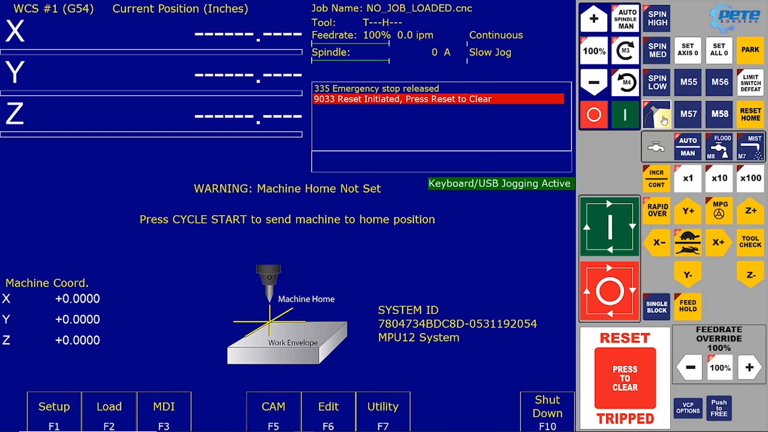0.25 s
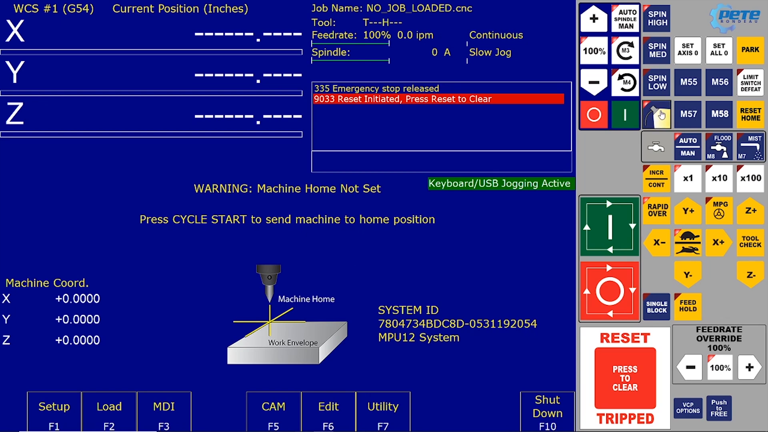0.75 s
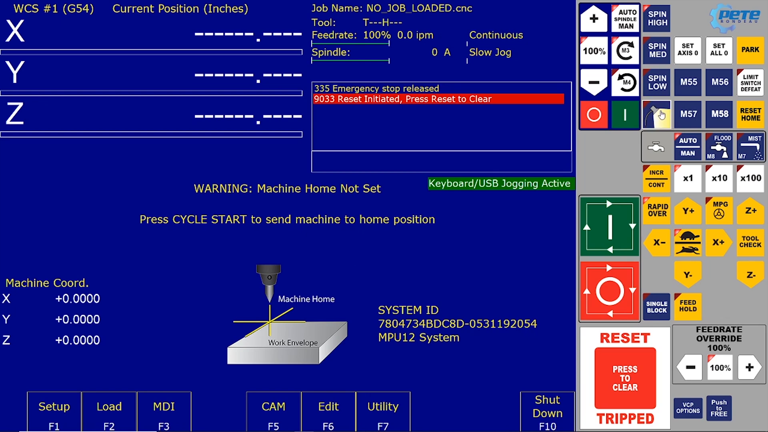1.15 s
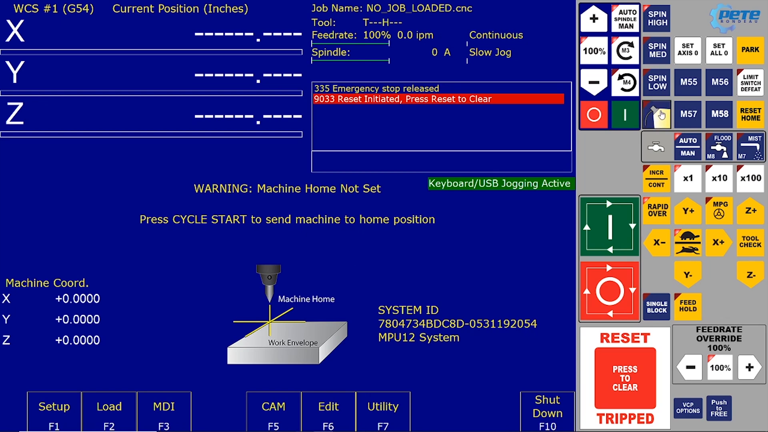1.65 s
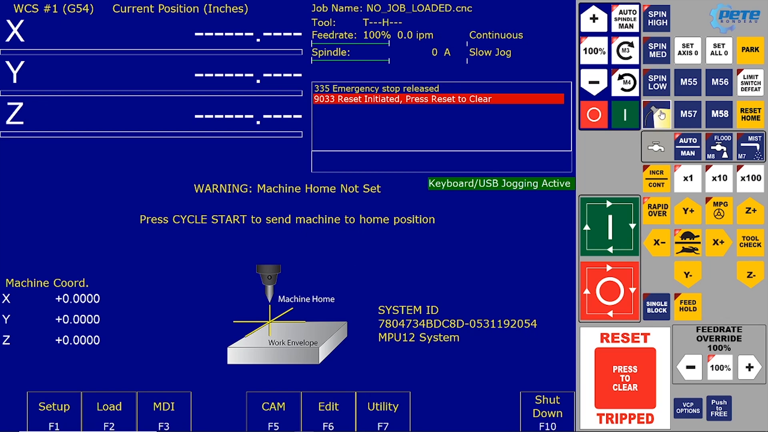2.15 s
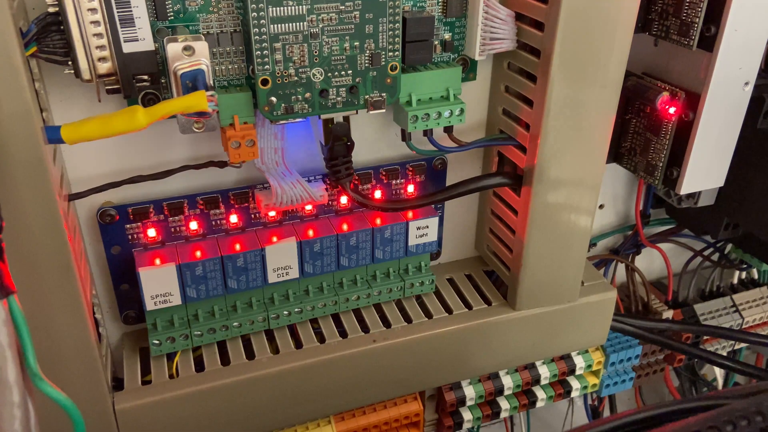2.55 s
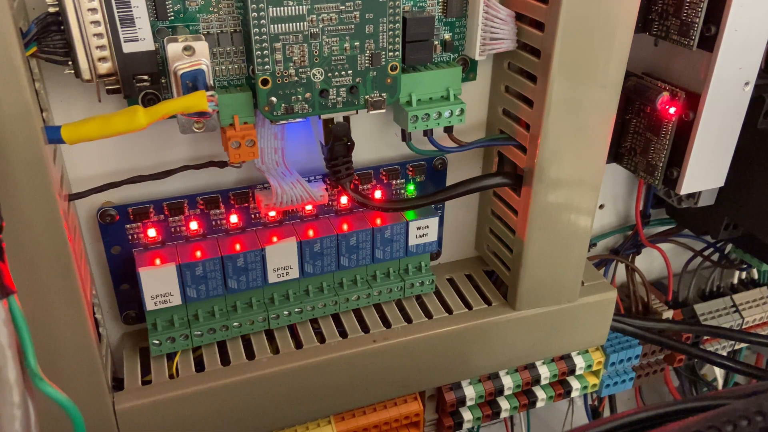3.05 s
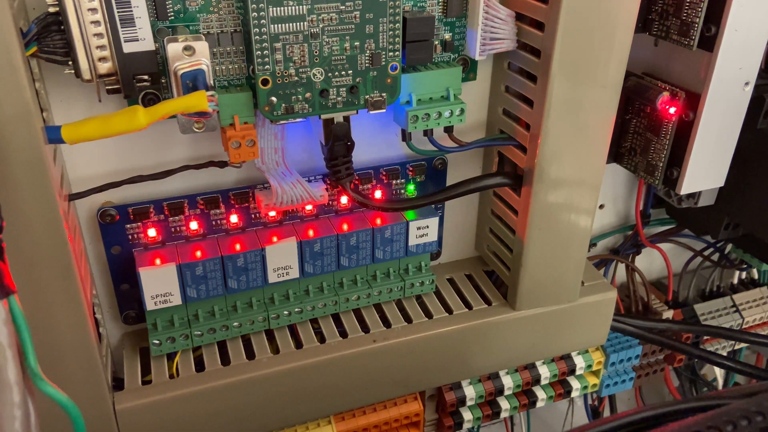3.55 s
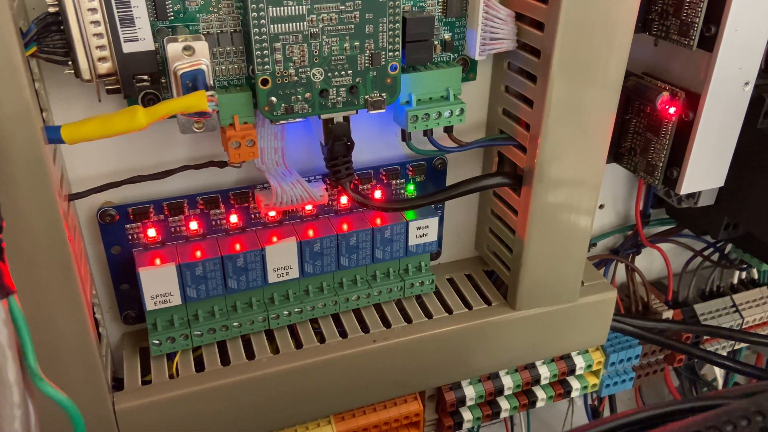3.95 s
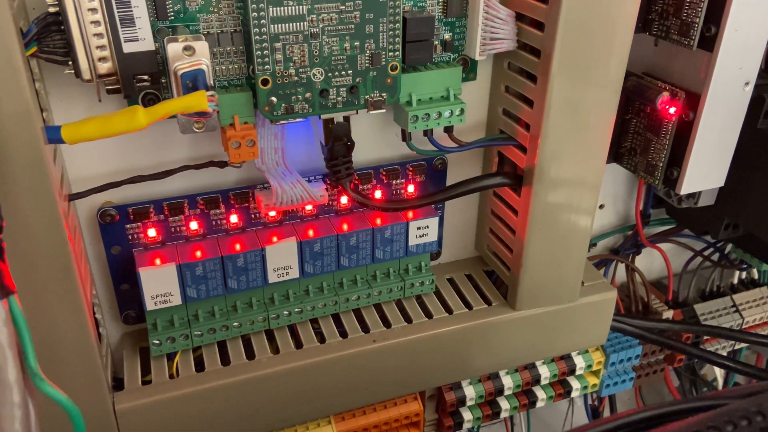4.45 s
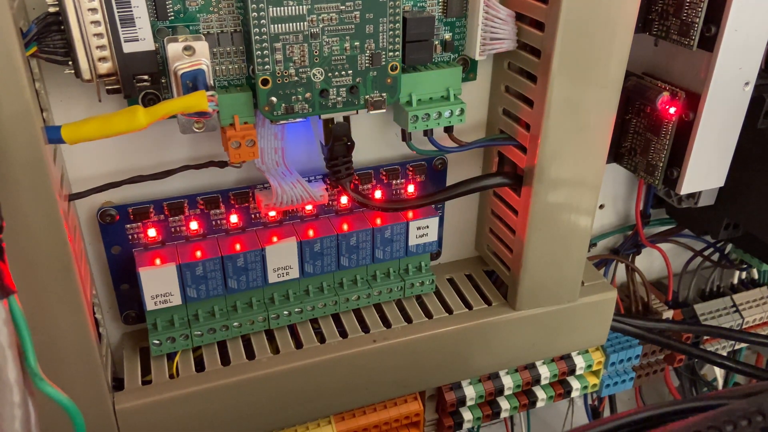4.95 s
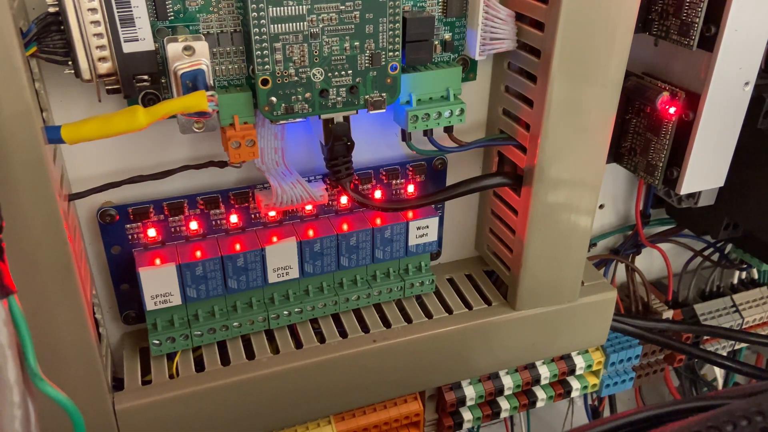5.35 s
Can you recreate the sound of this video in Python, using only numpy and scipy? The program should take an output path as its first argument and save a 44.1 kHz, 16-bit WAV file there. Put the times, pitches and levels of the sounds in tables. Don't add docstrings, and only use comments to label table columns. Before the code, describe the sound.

Close stereo view inside a steel control cabinet: steady fan air and low mains hum throughout. A soft relay release comes near one second, then a hard click and a quick release around two, with small jumps in the hum. Another sharp click follows at three seconds, a softer clack after four, and a click just starts as the sound ends. Very faint button taps precede switching.

```python
import sys
import numpy as np
from scipy import signal
from scipy.fft import rfft, irfft, next_fast_len
from scipy.io import wavfile

SR = 44100
rng = np.random.default_rng(int(sys.argv[2]) if len(sys.argv) > 2 else 0)


def voltage_ratio(decibels):
    exponent = np.asarray(decibels, float) / 20
    return 10 ** exponent


def persist_wave(psi):
    counts = np.round(np.clip(psi, -1, 1) * 32767).astype(np.int16)
    wavfile.write(sys.argv[1], SR, np.atleast_2d(counts).T)


N = 246519


def rms_one(x):
    return x / np.sqrt(np.mean(x ** 2) + 1e-20)


def at_hz(points, hz):
    table = np.array(points)
    return np.interp(np.log(hz + 1), np.log(table[:, 0]), table[:, 1])


def drift(rate_hz):
    r = np.exp(-80 * np.pi * rate_hz / SR)
    noise = rng.standard_normal(N // 40 + 2002)
    slow = signal.lfilter([1], [1, -2 * r, r * r], noise)[2000:]
    return np.interp(np.arange(N) / 40, np.arange(len(slow)), rms_one(slow))


def ring(blows, hz, t60_s):
    r = voltage_ratio(-60 / (t60_s * SR))
    w = 2 * np.pi * hz / SR
    return signal.lfilter([0, np.sin(w)], [1, -2 * r * np.cos(w), r * r], blows)


def coloured(noise, points):
    length = noise.shape[-1]
    hz = np.fft.rfftfreq(length, 1 / SR)
    return irfft(rfft(noise) * voltage_ratio(at_hz(points, hz)), length)


def sides(lean_db):
    return voltage_ratio(np.array([[.5], [-.5]]) * lean_db)


def place(shape, events):
    length = shape.shape[1]
    out = np.zeros((2, N + length))
    for start_s, level_db in events:
        start = round(start_s * SR)
        out[:, start:start + length] += voltage_ratio(level_db) * shape
    return out[:, :N]


# pitch_hz, level_db (per Hz)
AIR_COLOUR = [(22, -56), (36, -25.5), (60, -18), (128, -13.5), (242, -14.5), (291, -17.5), (577, -19),
              (752, -19), (2970, -32), (4300, -39), (6000, -44.5), (10000, -45.5), (15600, -54),
              (16100, -83)]
# pitch_hz, width_hz, level_db
DUCT_RESONANCES = [(48.7, 9.2, 10), (121, 9.7, 0), (147, 18, 3.5), (168.7, 21.4, 5), (199.5, 18, 9.5),
                   (347, 9.5, 6), (368, 39.5, 7), (480, 21, 4.5), (604, 42, 7.5), (910, 114, 3.5),
                   (1337, 330, 5), (1760, 97, -3.5), (1958, 200, 7.5), (2620, 100, 5), (3017, 230, 5),
                   (3820, 180, 2.5), (5050, 600, 7.5), (7260, 230, 0.5), (10900, 560, -1.5),
                   (11660, 520, 3.5), (15500, 700, 6.5)]
# pitch_hz, likeness (1 same, 0 unrelated, -1 opposite)
PORT_LIKENESS = [(30, 0.9), (200, 1), (330, 0.5), (600, 0.0069), (1400, -0.36), (2500, 0.47), (4200, 0.33),
                 (5500, -0.32)]
# pitch_hz, left_minus_right_db
AIR_LEAN = [(60, 0), (200, 1.5), (380, 4.5), (700, 3.5), (1290, -0.5), (2380, 5.5), (4400, 3), (5800, 1.7)]


def air():
    hz = np.fft.rfftfreq(N, 1 / SR)
    level_db = at_hz(AIR_COLOUR, hz)
    for centre_hz, width_hz, db in DUCT_RESONANCES:
        level_db = level_db + db / (1 + (2 * (hz - centre_hz) / width_hz) ** 2)
    alike = np.clip(at_hz(PORT_LIKENESS, hz), -.99, .99)
    mid, side = rfft(rng.standard_normal((2, N)))
    pair = np.sqrt(1 + alike) * mid + np.sqrt(1 - alike) * side * np.array([[1], [-1]])
    noise = irfft(pair * voltage_ratio(level_db) * sides(at_hz(AIR_LEAN, hz)), N)
    unsteady_db = 0.5 * drift(1.13) + 0.57 * drift(19.0)
    return voltage_ratio(-41.5 + unsteady_db) * rms_one(noise)


def tones(turns, orders, flutter_db, wobble_rad):
    out = 0
    for multiple, level_db, lean_db in orders:
        hz = multiple * (turns[-1] - turns[0]) * SR / N
        apart = np.array([[.5], [-.5]]) * min(hz / 500, 1) ** 2 * rng.choice([-1.3, 1.3])
        start_phase = rng.uniform(0, 2 * np.pi)
        phase = 2 * np.pi * multiple * turns + apart + start_phase + wobble_rad * drift(3.2)
        level = np.sqrt(2) * voltage_ratio(level_db + flutter_db * drift(5.5))
        out = out + level * sides(lean_db) * np.sin(phase)
    return out


# multiple of the mains, level_db, left_minus_right_db
MAINS_ORDERS = [(2, -50, 5.5), (4, -41.5, -0.5), (6, -63.5, 7), (8, -59.5, -1), (10, -59.5, 16.5),
                (12, -71.5, -12)]


def transformer(clock_s):
    return tones(60.02 * clock_s, MAINS_ORDERS, flutter_db=-0.28, wobble_rad=0.032)


# multiple of its turning speed, level_db, left_minus_right_db
SMALL_FAN_ORDERS = [(1.011, -56, -0.2), (3.982, -56.5, 4.5), (4.995, -68, 1), (5.94, -57, -7.5),
                    (28.24, -69.5, 7.5), (32.12, -72, 13), (36.02, -64.5, 7.5), (36.9, -75.5, 20)]


def small_fan(clock_s):
    return tones(81.8 * clock_s, SMALL_FAN_ORDERS, flutter_db=2.0, wobble_rad=0.25)


# multiple of its pitch, level_db, left_minus_right_db
WHINE_ORDERS = [(1, -53.5, 9)]


def motor_whine(clock_s):
    return tones(573 * clock_s, WHINE_ORDERS, flutter_db=2.0, wobble_rad=0.41)


# start_s, hold_s, level_db
GUSTS = [(1.743, .13, -34.5), (2.017, 0.013, -52), (2.125, .16, -40), (2.52, .19, -42), (2.87, 0.29, -39.5),
         (3.352, 0.12, -38), (3.577, 0.074, -45), (3.769, 0.11, -38.5), (4.032, 0.11, -45.5),
         (4.284, .04, -47.5), (4.453, .14, -41), (4.718, 0.21, -41.5), (5.003, 0.16, -35.5),
         (5.27, .3, -36)]


def gusts(s):
    rise_s, fall_s, calm_db = 0.076, 0.13, -52
    start_s, hold_s, level_db = np.transpose(GUSTS)[:, :, None]
    up = np.clip((s - start_s) / rise_s, 0, 1)
    down = np.clip(1 - (s - start_s - rise_s - hold_s) / fall_s, 0, 1)
    shape = np.sin(np.pi / 2 * np.minimum(up, down)) ** 2
    swelling = (voltage_ratio(level_db) * shape).sum(axis=0)
    return 20 * np.log10(voltage_ratio(calm_db) + swelling) + 0.55 * drift(5.7)


# time_s, skipped_s
SCENE_CHANGES = [
    (1.986, .62),
    (2.352, .47),
]
# multiple of the blade tone, level_db, left_minus_right_db
BLADE_ORDERS = [(2, -57, 4)]


def big_fan(s, clock_s):
    blade_hz, rise_hz_per_db = 141.8, 0.1
    level_db = gusts(s)
    before_last_change = s < SCENE_CHANGES[-1][0]
    hz = blade_hz + rise_hz_per_db * (level_db + 40) + 1.299 * before_last_change
    turns = np.cumsum(hz) / SR + blade_hz * (clock_s - s)
    wave = np.sin(2 * np.pi * turns + [[-.07], [.07]])
    blade = np.sqrt(2) * voltage_ratio(level_db) * sides(-0.35) * wave
    return blade + tones(turns, BLADE_ORDERS, flutter_db=3.0, wobble_rad=0.47)


def hum():
    s = np.arange(N) / SR
    clock_s = s + sum(skipped_s * (s >= at_s) for at_s, skipped_s in SCENE_CHANGES)
    return big_fan(s, clock_s) + motor_whine(clock_s) + transformer(clock_s) + small_fan(clock_s)


# time_s, level_db, sign
CHANGE_STEPS = [
    (1.853, -29, 1),
    (1.9857, -28.5, 0.89),
    (2.3526, -31, 1),
]


def change_jumps():
    step = np.exp(-np.arange(400) / SR / 0.00056) * np.ones((2, 1))
    return sum(sign * place(step, [(at_s, db)]) for at_s, db, sign in CHANGE_STEPS)


# start_s, level_db
BUTTON = [(2.085, -53), (2.945, -57), (3.10, -52), (4.285, -58), (4.452, -52.5), (5.49, -58)]
# pitch_hz, level_db (per Hz)
BUTTON_COLOUR = [(2500, -16), (4000, 3), (5300, 2), (7000, -2), (9000, -6), (12000, -19), (16000, -23)]


def button():
    s = np.arange(SR // 8) / SR
    swell = (1 - np.exp(-s / 0.0029)) * np.exp(-s / 0.033)
    out = 0
    for event in BUTTON:
        puff = rms_one(coloured(rng.standard_normal((2, len(s))), BUTTON_COLOUR))
        out = out + place(swell * puff, [event])
    return out


def contact_crackle(ms, at_ms, touches, noise, crack):
    force = 0
    for at, (level_db, rattle_ms) in zip(at_ms, touches):
        force = force + voltage_ratio(level_db) * (ms > at) * np.exp(-np.maximum(ms - at, 0) / rattle_ms)
    return force * rms_one(coloured(noise, crack))


def case_ringing(ms, at_ms, touches, modes):
    case = np.zeros((2, len(ms)))
    touch_db = np.array(touches)[:, 0]
    for hz, level_db, t60_s in modes:
        blows = np.zeros((2, len(ms)))
        sign = rng.choice([-1, 1], len(at_ms))
        strength = sign * voltage_ratio(rng.normal(0, 4.1, (2, len(at_ms))))
        blows[:, np.searchsorted(ms, at_ms)] = strength * voltage_ratio(touch_db + level_db)
        case += ring(blows, hz, t60_s)
    return case


def panel_answer(ms, panel):
    out = 0
    for hz, level_db, t60_s, late_ms in panel:
        since_ms = ms - late_ms
        rise = (since_ms > 0) * (1 - np.exp(-np.maximum(since_ms, 0) / 0.93))
        swell = rise * voltage_ratio(-60 * since_ms / t60_s / 1000)
        start_phase = rng.uniform(0, 2 * np.pi, (2, 1))
        out = out + voltage_ratio(level_db) * swell * np.sin(2 * np.pi * hz * ms / 1000 + start_phase)
    return out


def switching(at_ms, touches, modes, crack, panel, ring_db, tail_db, far_db):
    ms = np.arange(SR // 4) / SR * 1000 - 1
    shared, own = rng.standard_normal(len(ms)), rng.standard_normal((2, len(ms)))
    crackle = contact_crackle(ms, at_ms, touches, 0.56 * shared + 0.88 * own, crack)
    case = case_ringing(ms, at_ms, touches, modes)
    click = crackle / abs(crackle).max() + voltage_ratio(ring_db) * case / abs(case).max()
    click /= abs(click).max()
    dull = rms_one(coloured(coloured(own, crack), [(3000, 11.0), (8000, -3.0), (16000, -19)]))
    fade = voltage_ratio(tail_db - 60 * ms / 55) + voltage_ratio(far_db - 60 * ms / 280)
    click += (ms > 1.5) * dull * fade
    click += panel_answer(ms, panel)
    return click * sides(1.4)


# start_s, peak_db
PULL_IN = [
    (1.8605, -8.5),
    (3.0101, -8),
]
# start_s, peak_db
LAST_PULL_IN = (5.5885, -31)
PULL_TOUCH_MS = [-.2, .15, .45, .95, 2.1, 3.0, 4.6, 6.2]
# level_db, rattle_ms
PULL_TOUCHES = [(-33, 0.25), (-16, 0.33), (3.5, 0.26), (0.5, 0.7), (-13.5, 0.5), (-10.5, 0.97), (-9, 1.2),
                (-15, 3.1)]
# pitch_hz, level_db, t60_s (time to fade by 60 dB)
PULL_MODES = [(3330, -23, 0.055), (4220, -15, 0.043), (4810, -5.5, 0.03), (5000, -10, 0.039),
              (6530, -17, 0.047), (7000, -7.5, 0.022), (7200, -21, 0.028), (7760, -10.5, 0.036),
              (8270, -16, .03), (9070, 10, 0.017), (9370, -1.5, 0.027), (10050, -2, .02), (10440, -1, .02),
              (11700, -8, 0.018), (11840, 1, 0.02), (12740, 2.5, 0.013), (13240, -1, 0.02),
              (13900, -13, 0.013), (14200, -11, 0.026), (15100, -10, .02)]
# pitch_hz, level_db (per Hz)
PULL_CRACK = [(1000, -11.5), (3500, -28), (4800, -8), (5800, -22), (7000, -3.5), (9500, -4), (12000, 4),
              (13300, 0), (15500, -2), (16600, -18)]
# pitch_hz, level_db (against the click), t60_s, late_ms
PULL_PANEL = [(1650, -32, 0.068, 2.2), (1385, -35, 0.038, 7.6), (296, -36, 0.073, 4.4)]


def pull_in():
    click = switching(PULL_TOUCH_MS, PULL_TOUCHES, PULL_MODES, PULL_CRACK, PULL_PANEL,
                      ring_db=0.5, tail_db=-31.5, far_db=-39.0)
    events = np.array([*PULL_IN, LAST_PULL_IN]) - [.001, 0]
    return voltage_ratio(4.0) * place(click, events)


# start_s, peak_db
DROP_OUT = [
    (2.0057, -18),
    (4.3492, -17.5),
]
DROP_TOUCH_MS = [.2, 1.1, 2.3, 3.2, 4.6, 5.4, 6.8, 10.5]
# level_db, rattle_ms
DROP_TOUCHES = [(-23, 0.75), (4.5, 0.62), (4, .4), (-1.5, 0.53), (-4, 0.68), (-1, 1), (-6.5, 1.1),
                (-9, 1.1)]
# pitch_hz, level_db, t60_s (time to fade by 60 dB)
DROP_MODES = [(2270, -11.5, 0.043), (3288, -16, 0.034), (4035, -9, 0.033), (4280, -7, 0.043),
              (5240, -18.5, 0.059), (5710, -17, 0.046), (6550, -8, 0.039), (7000, -12, .025),
              (7500, -3, 0.018), (8310, 2.5, 0.023), (8900, -4, 0.016), (9500, -3, 0.0099),
              (9860, 3.5, 0.0099), (11070, 1, 0.013), (12100, 0, 0.013), (13600, -6, .02),
              (14880, -2, 0.018), (15250, -8, .015)]
# pitch_hz, level_db (per Hz)
DROP_CRACK = [(1000, 1), (2000, -23), (4200, -7.5), (5500, -5), (7000, 0.5), (9500, -7), (12500, -10),
              (15000, 0), (16600, -22)]
# pitch_hz, level_db (against the click), t60_s, late_ms
DROP_PANEL = [(854, -12, 0.082, 10.2), (525, -18, 0.057, 4.8), (1262, -22.5, 0.035, 4),
              (940, -21, 0.04, 17)]


def drop_out():
    click = switching(DROP_TOUCH_MS, DROP_TOUCHES, DROP_MODES, DROP_CRACK, DROP_PANEL,
                      ring_db=2.5, tail_db=-36, far_db=-40)
    return voltage_ratio(4.5) * place(click, np.array(DROP_OUT) - [.001, 0])


def scene():
    return air() + hum() + button() + pull_in() + drop_out()


def repeat_opening(x):
    end_s, later_samples, blend_s = 1.8523, 160072, 0.003
    keep = np.clip((np.arange(N) / SR - end_s) / blend_s + 1, 0, 1)
    return keep * x + (1 - keep) * np.roll(x, -later_samples, axis=1)


def one_port_treble(x):
    lag_samples, turn_rad = 10.5, 2.2
    size = next_fast_len(N + 4096)
    hz = np.fft.rfftfreq(size, 1 / SR)
    left, right = rfft(x, size)
    single = np.clip((hz - 6100) / 500 + .5, 0, 1)
    lagged = right * np.exp(-1j * (2 * np.pi * hz * lag_samples / SR + turn_rad))
    left = np.sqrt(1 - single) * left + np.sqrt(single) * lagged
    return irfft(np.array([left, right]), size)[:, :N]


def low_pass(x):
    return signal.sosfilt(signal.butter(12, 16880, fs=SR, output="sos"), x)


def record(dry):
    stereo = one_port_treble(repeat_opening(dry)) + change_jumps()
    top = signal.cheby2(10, 45, 16850, fs=SR, output="sos")
    mix = signal.sosfilt(top, stereo)
    return low_pass(mix)


dry = scene()
out = record(dry)
persist_wave(out)
```